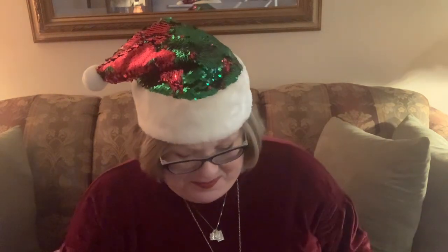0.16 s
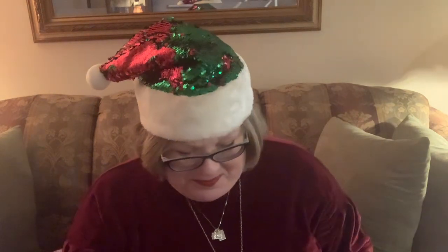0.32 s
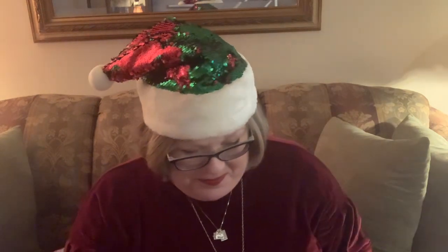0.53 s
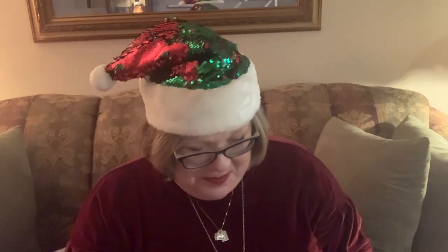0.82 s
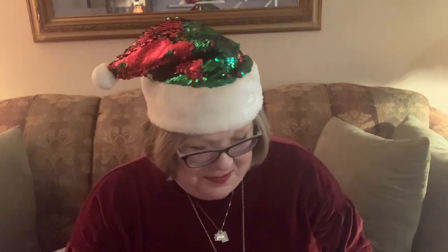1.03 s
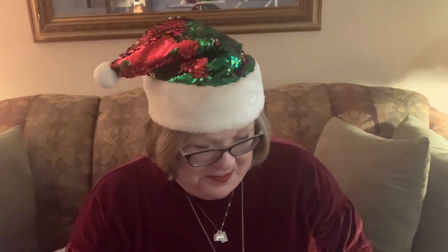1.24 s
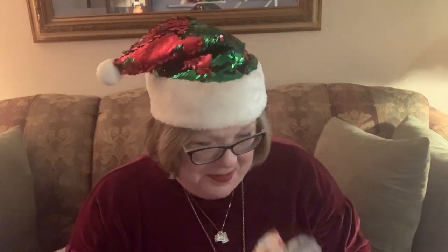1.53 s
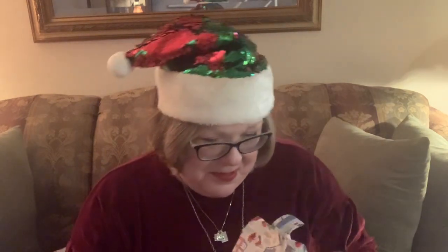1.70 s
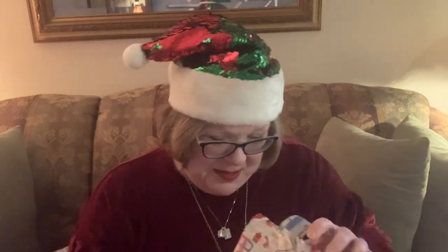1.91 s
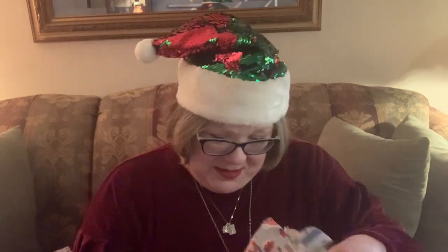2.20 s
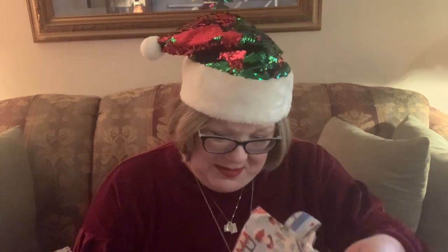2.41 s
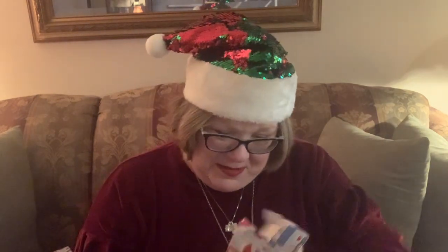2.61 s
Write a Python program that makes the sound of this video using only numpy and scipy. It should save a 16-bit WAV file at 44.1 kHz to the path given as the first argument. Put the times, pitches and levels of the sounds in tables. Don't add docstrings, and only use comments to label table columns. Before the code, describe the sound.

Wrapping paper crackles and rips sharply near the start, a cardboard box gives one hollow knock, two rustling sweeps follow, then a near lull and a firm final crumple, close stereo microphone, small furnished room.

```python
import sys
import numpy as np
from scipy import signal
from scipy.fft import rfft, irfft, next_fast_len
from scipy.io import wavfile
from scipy.ndimage import uniform_filter1d, map_coordinates

SR = 44100
rng = np.random.default_rng(int(sys.argv[2]) if len(sys.argv) > 2 else 0)


def wrap_up_sound(samples):
    columns = np.atleast_2d(samples).T
    tamed = np.clip(columns, -1, 1)
    steps = np.round(tamed * 32767).astype(np.int16)
    wavfile.write(sys.argv[1], SR, steps)


def boost(x):
    u = np.asarray(x, float) / 20
    return 10 ** u


N = 121275


def unit(x):
    return x / np.sqrt(np.mean(x ** 2) + 1e-20)


def along(points, hz):
    f, v = np.transpose(points)
    return np.interp(np.log(hz + 1), np.log(f + 1), v)


def curves(rows):
    s, *cols = np.transpose(rows)
    return [np.interp(np.arange(N) / SR, s, c) for c in cols]


def wobble(rate):
    return map_coordinates(rng.standard_normal(N // 50), [np.arange(N) * rate / SR])


def stroke(s, length):
    t = (np.arange(N) / SR - s) / length
    return np.clip(t / .25, 0, 1) * np.exp(-np.maximum(t - .75, 0) / .35)


def filtered(x, response):
    m = next_fast_len(N + 8192)
    return irfft(rfft(x, m) * response(np.fft.rfftfreq(m, 1 / SR)), m)[..., :N]


def coloured(x, spectrum):
    gain = lambda hz: boost(along(spectrum, hz))
    return filtered(x, lambda hz: gain(hz) / np.sqrt(np.mean(gain(hz) ** 2)))


def patchy(x, depth_db):
    z = signal.stft(x, nperseg=256)[2]
    field = uniform_filter1d(rng.standard_normal(z.shape), size=9, axis=0)
    field = uniform_filter1d(field, size=5, axis=1)
    return unit(signal.istft(z * boost(depth_db * unit(field)), nperseg=256)[1][:N])


def crinkle(spread_db, share):
    chance, size, sign = rng.random(N), rng.exponential(size=N), np.sign(rng.standard_normal(N))
    clicks_per_s = 900 * boost(4 * wobble(40))
    clicks = (chance < clicks_per_s / SR) * sign * boost(spread_db * np.minimum(size, 3))
    hiss = rng.standard_normal(N)
    return patchy(np.sqrt(share) * unit(clicks) + np.sqrt(1 - share) * hiss, depth_db=3.5)


# time in seconds, hand pressure in dB, box resonance over the hiss in dB.
HAND_PRESSURE = [
    (0.0, -59.5, -4),
    (1.18, -57.5, 1),
    (1.77, -80.5, 8),
    (2.44, -48, -10.5),
    (2.75, -71, 1),
]
# time in seconds, speed in dB, box resonance over the hiss in dB.
SHEET_SWEEPS = [
    [(0.74, -60, 12), (.9, -55.5, 4.5), (.95, -44, 8), (1.0, -44, 8), (1.2, -62, 13)],
    [(1.21, -47.5, 4.5), (1.39, -38.5, 5), (1.56, -66.5, 15.5)],
]
# start in seconds, length in seconds, level in dB, box resonance
# over the hiss in dB.
TEARS_AND_RUSTLES = [(0.445, 0.0089, -22, -22), (0.4525, 0.0093, -30, -8.5), (0.484, 0.011, -24.5, -16.5),
                     (.4945, 0.0051, -28, -2), (0.43, 0.003, -30, -7), (0.44, 0.0067, -46, -9),
                     (0.47, 0.014, -32.5, -5.5), (.778, 0.045, -47.5, -11), (0.847, 0.029, -48, -9),
                     (1.522, 0.066, -62, -7), (2.336, 0.017, -43, -5.5), (2.395, 0.0065, -37.5, -29),
                     (2.426, 0.011, -50, -26), (0.51, 0.013, -38.5, -9), (0.524, 0.018, -36, -5.5),
                     (0.544, 0.036, -48, -3), (0.679, 0.041, -59, 11), (0.187, 0.058, -55, 6),
                     (0.226, 0.059, -48.5, -11), (1.907, 0.035, -69.5, 11), (2.649, 0.023, -54.5, 1.5),
                     (0.101, 0.084, -46, -6.5), (0.287, 0.061, -49, -6), (2.02, 0.1, -54.5, 1.5),
                     (2.357, 0.018, -38, -6), (2.383, 0.01, -53, -7), (2.478, 0.066, -47.5, -9),
                     (2.548, 0.025, -43.5, -5.5), (1.769, 0.06, -58, -4), (1.996, 0.04, -59.5, -2.5),
                     (1.597, 0.066, -81, 21), (1.704, 0.0095, -75.5, 13), (1.845, 0.041, -59, 3.5),
                     (2.21, 0.036, -59, 9), (0.351, 0.0067, -43, 1), (2.242, 0.11, -55, 4)]


def motion():
    t = np.arange(N) / SR
    hand_db, box_db = curves(HAND_PRESSURE)
    hand_db = hand_db + 3 * wobble(55)
    hiss = boost(2 * hand_db)
    box = boost(1.958 * (hand_db + box_db + 0.5 * wobble(9.24)))
    for rows in SHEET_SWEEPS:
        speed_db, box_db = curves(rows)
        on = np.clip(np.minimum(t - rows[0][0], rows[-1][0] - t) / 0.052, 0, 1) ** 2
        hiss = hiss + on * boost(1.796 * (speed_db + 0.18 * wobble(54.0)))
        box = box + on * boost(2.243 * (speed_db + box_db + 0.46 * wobble(27.1)))
    for s, length, db, box_db in TEARS_AND_RUSTLES:
        on = stroke(s, length) ** 2
        hiss = hiss + on * boost(2 * db)
        box = box + on * boost(2 * (db + box_db))
    level = boost(-2)
    return level * np.sqrt(hiss), level * np.sqrt(box)


# frequency in Hz, level in dB.
PAPER_SPECTRUM = [(1200, -22.5), (2500, -8), (4500, -3), (7300, 0), (10500, -1), (13500, -4), (15000, -8),
                  (16500, -25)]
# frequency in Hz, level in dB.
BOX_SPECTRUM = [(100, -20), (250, -19), (420, -8), (750, -2.5), (1300, -2.5), (1800, -4), (2300, -8),
                (4000, -20.5)]


def sheet():
    hiss, box = motion()
    bright = hiss * coloured(crinkle(spread_db=4.3, share=.45), PAPER_SPECTRUM)
    return bright + box * coloured(crinkle(spread_db=3.46, share=.45), BOX_SPECTRUM)


# time in seconds, peak in dB, box thud over the
# snap in dB.
CREASE_SNAPS = [(0.0044, -32, -40), (0.0155, -32.5, -25), (0.0323, -35.5, -6.5), (0.1118, -19, -28),
                (0.1218, -18.5, -27.5), (0.1395, -27, -19.5), (0.151, -27.5, -31), (0.2088, -15.5, -31),
                (0.2283, -26, -17.5), (0.239, -19.5, -30), (0.2697, -31, -16), (0.313, -16.5, -28),
                (0.3272, -17, -29), (0.3431, -21, -26), (0.392, -33, -22.5), (0.4296, -9.5, -39.5),
                (0.4424, -2.5, -32), (0.5967, -30, -14.5), (0.6763, -17.5, -14.5), (0.76, -34, -12),
                (0.7716, -24, -30.5), (0.782, -35, -10.5), (.8235, -34, -17.5), (.8325, -28.5, -18.5),
                (0.8614, -28, -15), (.871, -31.5, -9.5), (.887, -37, -9), (0.9172, -37, -13),
                (0.9475, -22, -21), (0.9901, -27, -26), (1.1117, -23, -20.5),
                (1.2134, -30, -10), (1.2266, -33, -13), (1.254, -19.5, -26.5), (1.6563, -65, -6),
              (1.703, -65, 6), (1.7102, -53, -7), (1.7224, -56.5, 4), (1.7521, -45, -22),
              (2.0188, -40, -16), (2.0367, -35.5, -12.5), (2.0652, -39.5, -13), (2.348, -27, -20),
              (1.8432, -29.5, -26), (1.855, -44.5, -1.5), (1.9448, -61, -7), (2.0063, -67, -4),
              (2.1657, -26.5, -29), (2.2085, -43, 3), (2.224, -61, -1), (2.2598, -51, 4),
              (2.2715, -40.5, 1.5), (2.2933, -19, -35), (2.3196, -19, -24.5), (2.3381, -25, -9),
              (2.362, -38, -28), (2.372, -31, -29), (2.399, -28, -30.5), (2.441, -23, -38),
              (2.4765, -10.5, -34), (2.4902, -16, -33.5), (2.5556, -24.5, -11.5), (2.5626, -43, -30),
              (2.5736, -25.5, -17.5), (2.579, -20, -39), (2.6023, -23, -34), (2.6521, -22.5, -31.5),
              (.3462, -26, -27), (.301, -34, -15), (.318, -24, -28)]


def snaps():
    bright, dull, t = np.zeros(N + SR), np.zeros(N + SR), np.arange(SR // 8) / SR
    snap_t60, flutter_t60, thud_t60, aftershock_s = .002, .03, .022, .011
    rise = np.clip(t / .0007, 0, 1) ** 2
    pop = rise * boost(-60 * t / snap_t60)
    flutter = rise * boost(-26 - 60 * t / flutter_t60)
    hz = np.fft.rfftfreq(len(t), 1 / SR)
    for s, db, thud_db in CREASE_SNAPS:
        a, b = rng.standard_normal((2, len(t)))
        colour_db = 2.4 * np.interp(hz, np.linspace(0, SR / 2, num=12), rng.standard_normal(12))
        a = unit(irfft(rfft(a) * boost(colour_db), len(t)))
        a = a * np.linalg.norm(pop) / np.linalg.norm(a * pop)
        later = 0
        for when, weakness in rng.random((3, 2)):
            later = later + boost(-15 - 26 * weakness) * np.roll(pop, round(when * aftershock_s * SR))
        level_db, start = db + 4.5, round(s * SR)
        bright[start:][:len(t)] += boost(level_db) * a * (pop + later + flutter)
        dull[start:][:len(t)] += boost(level_db + thud_db - 60 * t / thud_t60) * b * rise
    return coloured(bright[:N], PAPER_SPECTRUM) + coloured(dull[:N], BOX_SPECTRUM)


# time in seconds, resonance in Hz, level in dB.
AIR_POCKET = [
    (1.22, 770, -55),
    (1.29, 383, -52),
    (1.40, 260, -52),
    (1.52, 800, -82),
]
# time in seconds, resonance in Hz, level in dB.
NARROW_FOLD = [
    (.22, 1850, -60),
    (.255, 1770, -54.5),
    (.33, 1750, -70),
    (.357, 1470, -49.5),
    (.39, 1740, -63),
    (.42, 1750, -63),
]


def pocket():
    hz, t, z = signal.stft(rng.standard_normal(N), SR, nperseg=1024)
    gain = 0
    for rows, width in (AIR_POCKET, .37), (NARROW_FOLD, .12):
        s, centre, db = np.transpose(rows)
        off = np.log((hz[:, None] + 1) / np.interp(t, s, centre)) / width
        gain = gain + boost(np.interp(t, s, db, -120, -120) + 19.0) / (1 + off ** 4)
    return signal.istft(z * gain, SR, nperseg=1024)[1][:N]


# frequency in Hz, level in dB, 60 dB decay time in seconds.
HOLLOW_MODES = [(217.4, -15, 0.16), (318, -15, 0.051), (390, -8.5, 0.056), (495, 1, 0.035), (746, 7, 0.028),
                (840, 6.5, 0.023), (1200, 1, 0.036), (1830, -5.5, 0.049)]


def knock():
    t = np.maximum(np.arange(N) / SR - .6768, 0)
    ring = 0
    for hz, db, t60 in HOLLOW_MODES:
        decay = boost(db - 60 * t / t60 + 40 * t * wobble(150))
        ring = ring + decay * np.sin(2 * np.pi * hz * t + 25 * t * wobble(150))
    return boost(-26.5) * ring * (1 - np.exp(-t / .0016)) * (t < .2)


# start in seconds, length in seconds, level in dB.
LAP_BUMPS = [
    (0.158, 0.1, -62),
    (0.31, 0.05, -63),
    (0.442, 0.095, -49.5),
    (0.657, 0.065, -56),
    (0.768, 0.044, -69),
    (1.348, 0.16, -63.5),
    (2.01, 0.13, -68.5),
]
# frequency in Hz, level in dB.
LAP_SPECTRUM = [(25, -31), (60, 9), (100, 1), (160, 8.5), (230, 0.5), (400, -33)]


def lap():
    power = sum(boost(2 * db) * stroke(s, length) ** 2 for s, length, db in LAP_BUMPS)
    return np.sqrt(power) * unit(coloured(rng.standard_normal(N), LAP_SPECTRUM))


# frequency in Hz, 60 dB decay time in seconds.
ROOM_DECAY = [(200, .16), (2000, .09), (12000, .05)]
# frequency in Hz, level in dB relative to the direct sound.
ROOM_LEVEL = [(100, -8.5), (1000, -6.5), (2500, -1.5), (5500, 1), (9000, -6), (14000, -2.5)]


def room(x):
    out, step = np.zeros((2, N + SR)), SR // 5
    for start in range(0, N, step):
        hz, t, z = signal.stft(rng.standard_normal((2, SR // 4)), SR, nperseg=256)
        decay = boost(-60 * t / along(ROOM_DECAY, hz)[:, None])
        tail = signal.istft(z * decay, SR, nperseg=256)[1]
        wet = signal.fftconvolve(x[None, start:start + step], tail / np.linalg.norm(tail[0]), axes=1)
        out[:, start + 60:][:, :wet.shape[1]] += wet
    return filtered(out[:, :N], lambda hz: boost(along(ROOM_LEVEL, hz)))


# frequency in Hz, level in dB.
HUSH_SPECTRUM = [(25, -8), (62, 3.5), (120, -8.5), (400, -13), (1200, -24), (3000, -29), (7000, -30),
                 (16000, -67)]


def hush():
    a = rng.standard_normal((3, N))
    return boost(-71 + 0.46 * wobble(9.5)) * coloured(0.73 * a[0] + 0.77 * a[1:], HUSH_SPECTRUM)


# frequency in Hz, left over right in dB.
PORT_LEAN = [(60, -8), (120, -1), (300, 11.5), (550, 1)]
# frequency in Hz, lag of the left port in radians.
PORT_LAG = [(200, 0.44), (700, 1.41), (1800, 1.43), (2800, 3.6), (5000, 6.1), (7500, 8.99), (10000, 10.01),
            (12500, 5.68)]


def scene():
    wide, point = sheet() + lap() + pocket(), snaps() + knock()
    sides = np.array([[1], [-1]])
    level = lambda hz: boost(.5 * sides * along(PORT_LEAN, hz))
    phase = lambda hz: np.exp(-.5j * sides * along(PORT_LAG, hz) * (hz > 0))
    ports = filtered(wide + point, lambda hz: level(hz) * phase(hz))
    return ports + room(wide + boost(-13) * point) + hush()


def band_limit(x):
    return signal.sosfilt(signal.butter(12, 16620, fs=SR, output="sos"), x)


def record(dry):
    band = lambda hz: np.where(hz < 15850, 1, boost(-32)) * hz ** 4 / (hz ** 4 + 42 ** 4)
    return band_limit(filtered(dry, band))


dry = scene()
out = record(dry)
wrap_up_sound(out)
```